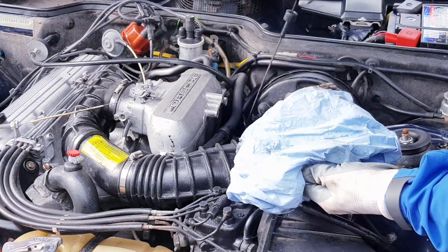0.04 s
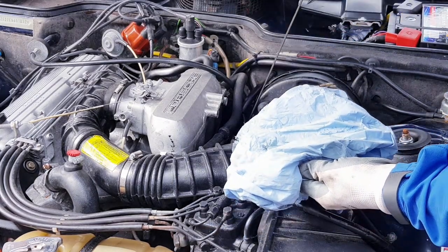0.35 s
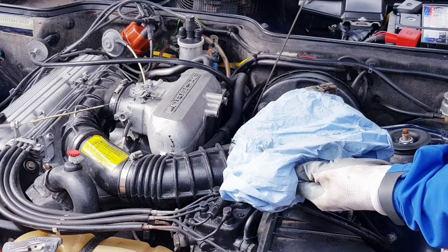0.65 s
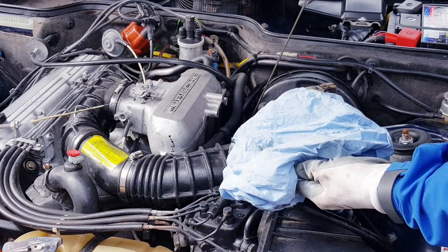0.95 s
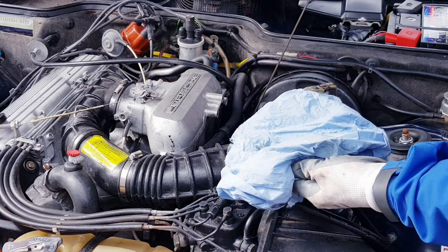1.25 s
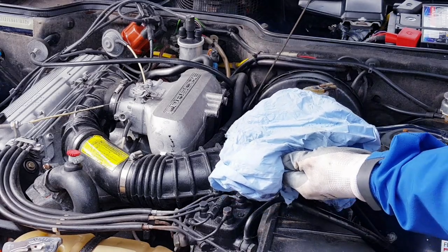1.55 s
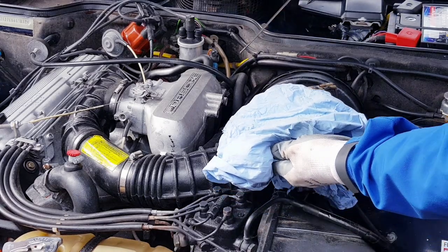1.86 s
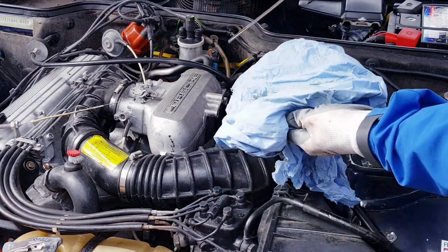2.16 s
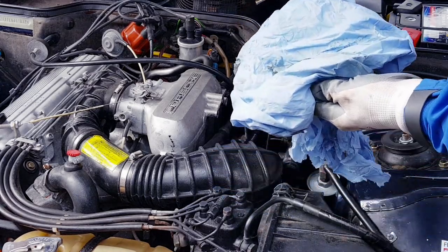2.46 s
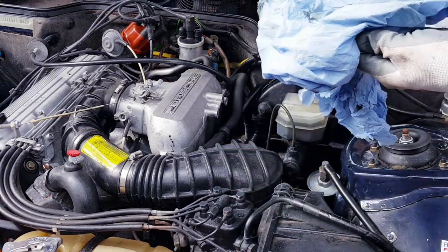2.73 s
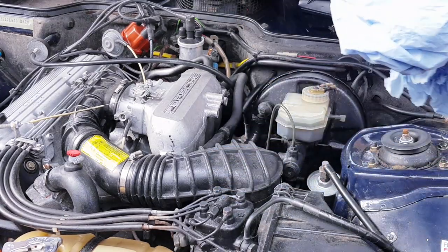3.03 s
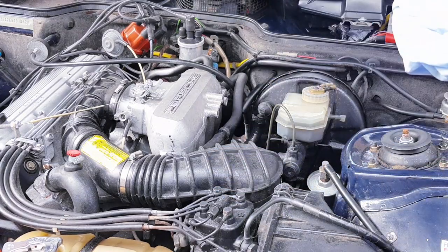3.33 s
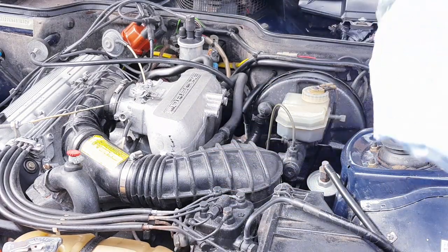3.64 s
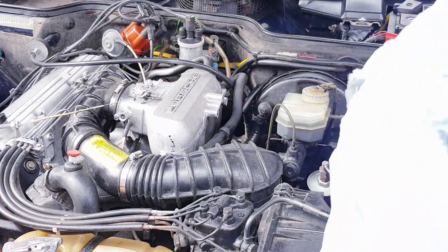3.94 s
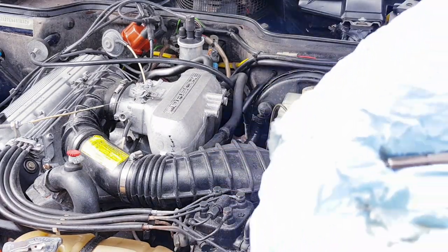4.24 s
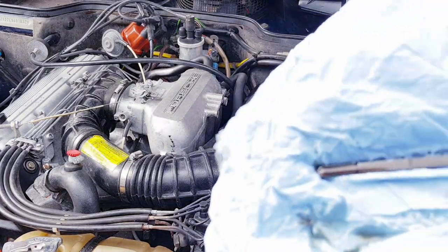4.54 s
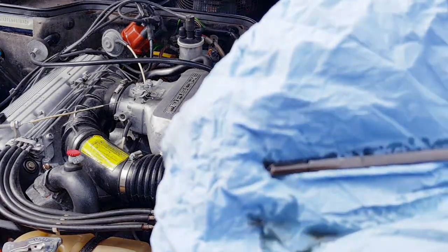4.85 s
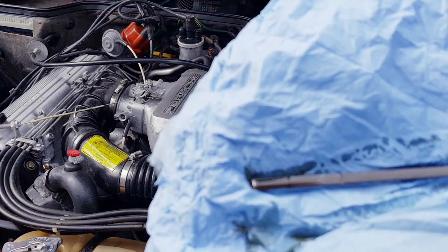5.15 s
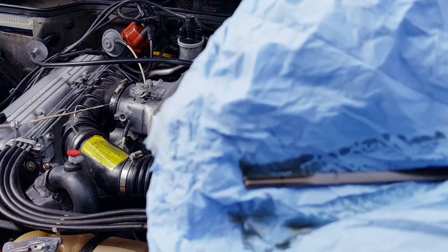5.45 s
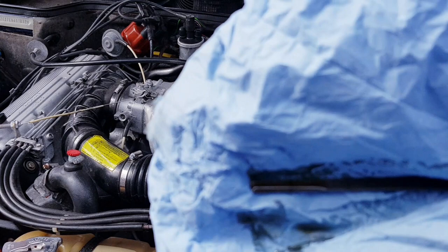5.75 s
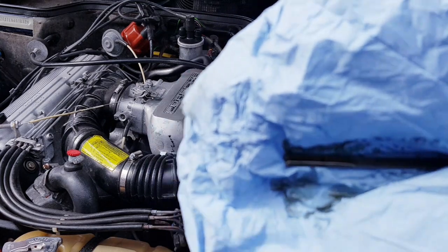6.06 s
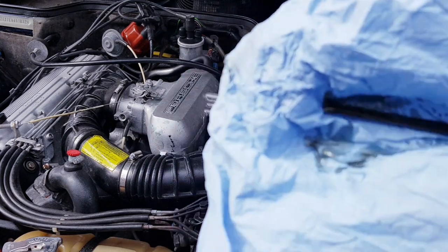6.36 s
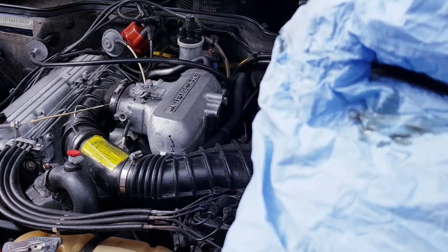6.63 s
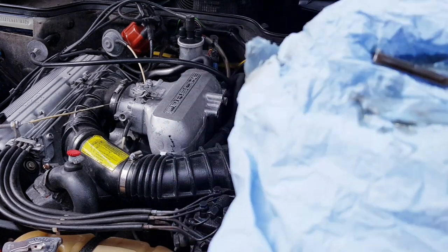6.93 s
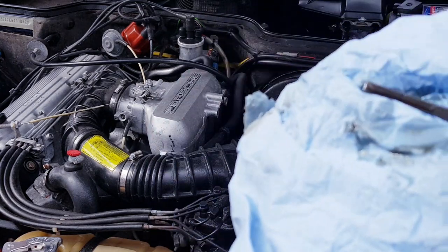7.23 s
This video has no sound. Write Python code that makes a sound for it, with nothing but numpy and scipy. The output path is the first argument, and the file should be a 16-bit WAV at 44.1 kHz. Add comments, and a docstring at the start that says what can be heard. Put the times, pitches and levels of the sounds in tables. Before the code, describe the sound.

Outdoors, distant engines and traffic hum low and steadily. Close to the microphone, a dipstick gives a faint metallic scrape in its tube, then a paper towel swishes softly, with a few light hollow knocks and the hiss of a sleeve. In the second half the towel rustles louder as it wipes the rod, its creases snapping crisply. Short puffs of wind thump the left side of the hand-held stereo microphone, mostly near the end.

```python
"""Far engines drone in traffic while, close to the microphone, a dipstick scrapes in its tube.
Outdoors, over an open engine bay, the steel rod is drawn out and wiped with a paper towel.
Rod and hand knock, paper fibres slip and hiss, the squeezed wad swishes and creases snap.
A sleeve slides by on the right; puffs of wind buffet the left port of the hand-held stereo microphone."""
import sys
import numpy as np
from scipy import signal
from scipy.fft import rfft, irfft, next_fast_len
from scipy.io import wavfile
from scipy.ndimage import map_coordinates

SR = 44100
rng = np.random.default_rng(int(sys.argv[2]) if len(sys.argv) > 2 else 0)


def int16_out(signal):
    """Quantize to a 16-bit WAV file."""
    q = np.round(np.clip(np.atleast_2d(signal).T, -1, 1) * 32767)
    wavfile.write(sys.argv[1], SR, q.astype(np.int16))


N = 321489
TIME = np.arange(N) / SR

# a far engine at idle: t/s, level/dB
IDLING_ENGINE = [(0, -38), (.7, -41), (1.45, -52), (1.75, -45), (3.1, -46.5), (3.4, -65), (4.6, -48),
                 (5.25, -61), (6.3, -47), (6.65, -48), (7.29, -60)]
# a far vehicle gathering speed, then easing off: t/s, firing f/Hz, level/dB
MOVING_ENGINE = [(0, 59.67, -49), (1.3, 63.05, -61), (1.8, 65.55, -42.5), (2.65, 68.32, -47),
                 (3.4, 69.93, -68.5), (3.9, 70.83, -44.5), (4.85, 71.25, -49), (5.4, 72.23, -53),
                 (6.2, 69.57, -44.5), (6.75, 67.84, -54), (6.98, 66.16, -39.5), (7.29, 66.8, -38.5)]
# spectrum of the far traffic: f/Hz, relative level/dB
TRAFFIC_SPECTRUM = [(45, 2.5), (100, -2), (165, -11.5), (260, -10.5), (380, -16.5), (600, -15.5),
                    (900, -14.5), (1300, -19.5), (1650, -28), (2100, -38.5), (3000, -54.5), (8000, -61)]
# how alike the two ports hear the traffic: f/Hz, coherence
TRAFFIC_COHERENCE = [(60, 0.98), (290, 0.83), (640, 0.13), (1300, -0.56), (2500, 0.46)]
# the rod pushed home, then drawn out: start t/s, length/s, level/dB
ROD_SCRAPES = [(-0.04, 0.21, -66), (0.13, 0.08, -62), (0.218, 0.035, -63.5), (1.7, 0.72, -79.5)]
# resonances of the dipstick tube: f/Hz, relative level/dB
TUBE_SPECTRUM = [(2250, -27), (2560, -3.5), (2800, -0.5), (3080, -24), (4200, -37), (4900, -26),
                 (5300, -13.5), (5800, -23), (6500, -20), (7700, -17), (13000, -22.5)]
# strokes of the towel: start t/s, length/s, level/dB, hollow wad over fibre hiss/dB
TOWEL_WIPES = [(-0.05, 0.16, -69, -5), (1.398, 0.75, -72.5, 10), (2.418, 1.36, -75, 7),
               (4.236, 0.38, -68, 3), (4.29, 0.12, -66, -12), (4.84, 0.32, -63.5, 1.5),
               (4.985, 0.031, -65, -10), (5.134, 0.21, -53.5, -3.5), (5.265, 0.045, -56.5, -6),
               (5.362, 0.067, -57, -2.5), (5.56, 0.081, -64.5, 5), (5.621, 0.2, -56.5, -1.5),
               (5.766, 0.023, -52, -14), (5.82, 0.17, -60, -2), (6.004, 0.18, -63.5, -4),
               (6.212, 0.86, -59, -1.5), (6.625, 0.091, -58.5, 4), (6.716, 0.083, -56, 5),
               (6.825, 0.2, -61, 2.5), (7.238, 0.064, -62.5, -12.5)]
# where the towel is in front of the microphone: t/s, left minus right/dB
TOWEL_PAN = [(0, 3), (2.1, 3), (3.4, 0), (4.7, -3), (5.1, 1.5), (5.7, -0.5)]
# hiss of the paper fibres: f/Hz, relative level/dB
FIBRE_SPECTRUM = [(700, -7.5), (1500, 4.5), (2300, 0.5), (3600, -1), (5300, -1), (7000, -3.5), (8500, -7),
                  (12000, -5.5), (15500, -13.5)]
# swish of the hollow wad: f/Hz, relative level/dB
WAD_SPECTRUM = [(250, -13), (500, -6.5), (850, 0.5), (1400, -1.5), (2150, -9), (3200, -25.5), (6000, -24.5)]
# gusts of the breeze: peak t/s, level/dB, half length/s
WIND_GUSTS = [(1.2, -38.5, 0.25), (2.15, -48, 0.53), (4.3, -53.5, 0.57), (6.607, -40.5, 0.3)]
# puffs on the microphone: peak t/s, level/dB, half length/s
WIND_PUFFS = [(1.079, -29, 0.013), (1.142, -39, 0.01), (1.187, -31, 0.012), (1.225, -29, 0.01),
              (1.254, -31.5, 0.0093), (1.526, -30, 0.0092), (2.364, -34, 0.015), (2.831, -38.5, 0.011),
              (5.944, -32.5, 0.0093), (6.326, -31, 0.012), (6.381, -24, 0.0087), (6.524, -34.5, 0.012),
              (6.565, -24, 0.0061), (6.588, -21, 0.0034), (6.655, -26, 0.006), (6.674, -18.5, 0.0054),
              (6.834, -19.5, 0.01), (6.864, -28.5, 0.015), (6.938, -30, 0.013), (6.992, -32, 0.017),
              (7.106, -31, 0.0058)]
# the overall's sleeve beside the microphone: start t/s, length/s, level/dB
SLEEVE_STROKES = [(1.605, 0.06, -67), (2.28, 0.085, -76), (3.2, 0.75, -73.5), (4.03, 0.69, -72)]
# hiss of the sleeve's cloth: f/Hz, relative level/dB
CLOTH_SPECTRUM = [(3500, -17), (5000, 6), (6400, 4), (8000, -7), (12000, -2)]
# taps of rod and hand: t/s, peak before muffling/dB, favoured f/Hz, amount of rattle
ROD_KNOCKS = [(2.677, -32.5, 340, 0.17), (2.908, -36.5, 940, .7), (3.703, -37.5, 700, .15),
              (3.878, -39, 1130, .7), (4.041, -35, 390, 0.22), (4.055, -35.5, 1220, 0.59)]
# modes that the taps ring: f/Hz, relative level/dB, t60/s
HOLLOW_MODES = [(320, 9, 0.015), (530, -3, 0.045), (730, -5, 0.064), (1095, -9.5, 0.024),
                (1465, -9.5, 0.037), (1695, -16, 0.087)]
# flicks of the hanging paper: peak t/s, level/dB, rise/s, decay/s
PAPER_BRUSHES = [(2.693, -54.5, 0.014, 0.049), (2.783, -70, 0.0086, 0.066), (2.911, -54.5, 0.017, 0.028),
                 (3.14, -61.5, 0.036, 0.04), (4.049, -63.5, 0.012, 0.069)]
# rustle of the paper's loose end: f/Hz, relative level/dB
LOOSE_END_SPECTRUM = [(200, -37), (450, 9.5), (700, 9), (1400, 4.5), (2500, -5.5), (5000, -7.5),
                      (8500, -12.5), (13000, -8), (16000, -31)]
# crackles of the loose end: f/Hz, relative level/dB
CRACKLE_SPECTRUM = [(1500, -14), (5000, 6), (12000, -7), (16000, 6.5)]
# creases that snap: t/s, peak level/dB, tilt/(dB per octave)
CREASE_SNAPS = [(4.046, -40.5, 5), (4.6217, -38, 6), (4.873, -42, 8), (4.9374, -42, 3), (5.0252, -38, 7),
                (5.195, -40, -1), (5.2104, -31, 0), (5.219, -32.5, -2), (5.237, -35, -4),
                (5.337, -33.5, -7), (5.756, -36, -3), (5.797, -35, -4), (5.8032, -35, -8),
                (5.8822, -32.5, -1), (5.956, -38, 0), (5.966, -40, -1), (6.0782, -35, -3),
                (6.0877, -36.5, -4), (6.138, -38.5, -3), (6.154, -42, -2), (6.2522, -44, 6),
                (6.3393, -39, 3), (6.44, -37, -4), (6.493, -40, -1), (6.536, -35.5, -2),
                (6.6752, -34.5, -5), (6.997, -33.5, 3)]
# how the two microphone ports differ in colour: f/Hz, left minus right/dB
PORT_BALANCE = [(2400, 1), (4400, -4.5), (8100, 1.5), (13000, 3.5)]
# the microphone's own hiss: f/Hz, relative level/dB
HISS_SPECTRUM = [(3000, 0), (5000, -4), (8000, -13), (9700, -3), (11000, 3.5), (12500, 6), (14000, 4.5)]


def undb(db):
    """Decibels to gain."""
    return 10 ** (np.asarray(db) / 20)


def unit(x):
    """Scale to rms 1."""
    return x / np.sqrt(np.mean(x ** 2))


def pan(balance_db):
    """Gains of the two ports for a left minus right level."""
    return undb(np.array([[0.5], [-0.5]]) * balance_db)


def curves(rows):
    """Each column of a table, joined by lines in time."""
    times, *columns = np.transpose(rows)
    return [np.interp(TIME, times, column) for column in columns]


def across(points, hz):
    """Read (f/Hz, value) points on a log-frequency axis."""
    f, value = np.transpose(points)
    return np.interp(np.log(hz + 1e-3), np.log(f), value)


def shape(x, response):
    """Filter by a gain that is a function of frequency."""
    size = next_fast_len(x.shape[-1], True)
    return irfft(rfft(x, size) * response(np.fft.rfftfreq(size, 1 / SR)), size)[..., :x.shape[-1]]


def colour(x, points):
    """Give x a spectrum of (f/Hz, level/dB) points, at rms 1."""
    return unit(shape(x, lambda hz: undb(across(points, hz))))


def noise(samples=N):
    """Unrelated white noise at the two ports."""
    return rng.standard_normal((2, samples))


def walk(rate_hz):
    """A random drift with a spread near 1."""
    knots = rng.standard_normal(16384)
    return 1.2 * np.interp(TIME * rate_hz, np.arange(len(knots)), knots)


def add(out, s, sound):
    """Mix a short stereo sound in at time s."""
    start = int(s * SR)
    out[:, start:start + sound.shape[-1]] += sound[..., :N - start]


def grains(per_s, spread_db):
    """Tiny slips of uneven size; each reaches the two ports with its own strength."""
    size = undb(spread_db * np.minimum(rng.exponential(size=N), 3))
    return unit((rng.random(N) < per_s / SR) * size * noise())


def strokes(rows):
    """Joint gain of hand movements, added in power; a long one starts and stops more gently."""
    power = np.zeros(N)
    for start, length, db in rows:
        attack_s, release_s = 0.02 + 0.15 * length, 0.014 + 0.1 * length
        attack = np.clip((TIME - start) / attack_s, 0, 1)
        release = np.exp(-np.maximum(TIME - start - length, 0) / release_s)
        power += (undb(db) * attack * release) ** 2
    return np.sqrt(power)


def engine(firing_hz, level_db, harmonics_db, waver_db):
    """From afar only the lowest firing harmonics arrive, wavering in the moving air."""
    phase = 2 * np.pi * np.cumsum(firing_hz * (1 + 0.01421 * walk(9))) / SR
    tone = sum(undb(db + waver_db * walk(11)) * np.sin(k * phase) for k, db in enumerate(harmonics_db, 1))
    return unit(tone) * undb(level_db)


def traffic(midband_db=-56.5, rise_db_per_s=0.28):
    """A wide far roar: alike at both ports in the bass, partly opposed where they are half a wave apart."""
    mid, side = noise()
    mid = shape(mid, lambda hz: np.sqrt(1 + across(TRAFFIC_COHERENCE, hz)))
    side = shape(side, lambda hz: np.sqrt(1 - across(TRAFFIC_COHERENCE, hz)))
    roar = colour(np.array([mid + side, mid - side]), TRAFFIC_SPECTRUM)
    roar /= np.std(shape(roar, lambda hz: (hz > 250) & (hz < 900)))
    return roar * undb(midband_db + rise_db_per_s * TIME + walk(6) / 2) * pan(1)


def rod(pitch_bend=0.065):
    """Close up, the steel strip sticks and slips and rings its tube: a faint rasp, higher with speed."""
    speed = strokes(ROD_SCRAPES)
    ring = colour(grains(per_s=4000, spread_db=6.5), TUBE_SPECTRUM)
    read_at = np.cumsum(1 + pitch_bend * (speed / speed.max() - 1))
    rasp = np.array([map_coordinates(port, [read_at], order=3, mode="mirror") for port in ring])
    return rasp * speed * undb(walk(38.3))


def glove_bounce(x, delay_s=0.001106, drift=0.2, bounce_db=-9):
    """Sound also bounces off glove and folds; the path shifts with the hand, so the colour moves."""
    late = np.zeros_like(x)
    for side, port in enumerate(x):
        delay = delay_s * (1 + drift * walk(5))
        late[side] = map_coordinates(port, [(TIME - delay) * SR], order=1, mode="mirror")
    return unit(x + undb(bounce_db) * late)


def catches(per_s=44, decay_s=0.0067):
    """The paper catches at random and lets go: each jerk starts at once and dies away."""
    jerks = (rng.random(N) < per_s / SR) * rng.uniform(0.3, 1, N)
    return signal.lfilter([1], [1, -np.exp(-1 / (decay_s * SR))], jerks)


def towel(gain_db=1.72, crackle_db=-10, catch_depth=0.49, fold_db=0.28):
    """Close up, fibres slip densely, creases crackle and the squeezed wad adds a hollow swish."""
    wrapped = (3.78, 5.3, -68.5)  # once round the rod it keeps brushing: start t/s, length/s, level/dB
    rub = strokes([(s, length, db) for s, length, db, _ in TOWEL_WIPES] + [wrapped])
    squeeze = strokes([(s, length, db + wad_db) for s, length, db, wad_db in TOWEL_WIPES])
    slips = grains(per_s=15000, spread_db=-0.5) + undb(crackle_db) * grains(per_s=420, spread_db=4)
    fibres = glove_bounce(colour(slips, FIBRE_SPECTRUM)) * unit(1 + catch_depth * catches())
    # shifting folds shade the dull and the bright part of the hiss separately
    dull = shape(fibres, lambda hz: 1 / (1 + (hz / 6000) ** 4))
    fibres = dull * undb(-fold_db * walk(21)) + (fibres - dull) * undb(-fold_db * walk(13))
    wad = glove_bounce(colour(grains(per_s=6000, spread_db=0.5), WAD_SPECTRUM))
    balance_db, = curves(TOWEL_PAN)
    return (fibres * rub + wad * squeeze) * undb(gain_db) * pan(balance_db)


def eddies(x, corner_hz, low_hz=45):
    """Pressure at each port, at rms 1: a band of swirls that ends steeply above the corner."""
    def band(hz):
        return (hz / low_hz) ** 4 / (1 + (hz / low_hz) ** 4) / np.sqrt(1 + (hz / corner_hz) ** 7)
    return np.array([unit(shape(port, band)) for port in x])


def wind(right_db=-15, flutter_db=0.5):
    """Short buffets on the microphone over the gusts of a light breeze; the right port is sheltered."""
    gusts = sum(undb(db) * np.exp(-((TIME - s) / half_s) ** 2 / 2) for s, db, half_s in WIND_GUSTS)
    out = eddies(noise(), corner_hz=72) * gusts * undb(-flutter_db * walk(16))
    t = TIME[:8192] - TIME[4096]
    for s, db, half_s in WIND_PUFFS:
        window = np.exp(-(t / half_s) ** 2 / 2)
        corner_hz = 102.3 * (0.0047 / half_s) ** 0.46  # a short puff is a small eddy and reaches higher
        puff = eddies(noise(len(t)) * window, corner_hz)
        add(out, s + t[0], undb(db) * puff * np.sqrt(np.mean(window ** 2)))
    return out * undb([[0], [right_db]])


def sleeve(waver_db=2.0):
    """Woven cloth slides with a smooth narrow hiss, just right of the microphone."""
    return colour(noise(), CLOTH_SPECTRUM) * strokes(SLEEVE_STROKES) * undb(waver_db * walk(9)) * pan(-6)


def knocks(rattle_s=0.016, muffle_hz=1950):
    """Rod and hand knock hollowly; each contact drives the modes near its pitch, then rattles briefly."""
    out, t = np.zeros((2, N)), TIME[:6000]
    for s, db, contact_hz, rattle in ROD_KNOCKS:
        ring = np.zeros(len(t))
        for k, (hz, mode_db, t60) in enumerate(HOLLOW_MODES):
            drive = (-1) ** k / (1 + 2 * np.log2(hz / contact_hz) ** 2)
            ring += drive * undb(mode_db - 60 * t / t60) * np.sin(2 * np.pi * hz * t)
        touches = rattle * noise(len(t)) * np.exp(-t / rattle_s) / 10
        touches[:, 0] = 1  # the first, firm touch
        hit = signal.fftconvolve(touches, ring[None], axes=1)
        add(out, s, undb(db) * hit / np.abs(hit).max())
    return shape(out, lambda hz: 1 / np.sqrt(1 + (hz / muffle_hz) ** 20))  # glove and paper muffle it


def brushes(gain_db=7.0, crackle_db=-8):
    """The hanging paper flicks past: a quick swell of slips and crisp crackles that dies away."""
    swell = np.zeros(N)
    for s, db, rise_s, decay_s in PAPER_BRUSHES:
        t = TIME - s
        swell += undb(db) * np.exp(-np.where(t < 0, (t / rise_s) ** 2, t / decay_s))
    slips = colour(grains(per_s=14000, spread_db=-4.5), LOOSE_END_SPECTRUM)
    crackles = colour(grains(per_s=900, spread_db=0.5), CRACKLE_SPECTRUM)
    return (slips + undb(crackle_db) * crackles) * swell * undb(gain_db)


def snaps(buckle_s=0.00023, flutter_s=0.004, flutter_db=-17):
    """A crease buckles near the microphone and the sheet flutters briefly; tight creases are brighter."""
    out, t = np.zeros((2, N)), TIME[:1024]
    fade = np.exp(-t / buckle_s) + undb(flutter_db) * np.exp(-t / flutter_s)
    for s, db, tilt_db in CREASE_SNAPS:
        spectrum = [(hz, fibre_db + tilt_db * np.log2(hz / 1000)) for hz, fibre_db in FIBRE_SPECTRUM]
        burst = np.roll(noise(len(t)) * fade, 16, axis=1)  # room for the filter to ring ahead
        click = colour(burst, spectrum)
        add(out, s, undb(db) * click / np.abs(click).max())
    return out


def scene():
    """Engines and traffic far off, rod and paper close in front, wind on the microphone."""
    idling = engine(45, *curves(IDLING_ENGINE), harmonics_db=(0, -21, -33.5), waver_db=0.3)
    moving = engine(*curves(MOVING_ENGINE), harmonics_db=(0, -16, -28.5), waver_db=3.5) * pan(2)
    close = towel() + brushes() + snaps() + sleeve() + knocks() + rod()
    return idling + moving + close + wind() + traffic()


def record(dry, hiss_db=-69.5, low_cut_hz=37, top_hz=15700):
    """Each side of the microphone adds its own colour and hiss; the deepest bass and the top are cut."""
    heard = shape(dry, lambda hz: pan(across(PORT_BALANCE, hz)))
    heard += undb(hiss_db) * colour(noise(), HISS_SPECTRUM)
    heard = shape(heard, lambda hz: (hz / low_cut_hz) ** 7 / np.sqrt(1 + (hz / low_cut_hz) ** 14))
    return signal.sosfilt(signal.ellip(10, 0.2, 80, top_hz, fs=SR, output="sos"), heard)


dry = scene()
out = record(dry)
int16_out(out)
```